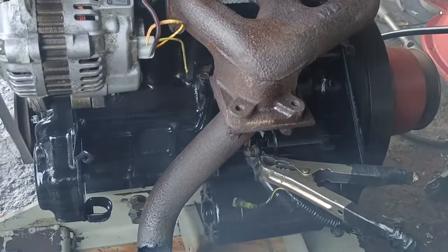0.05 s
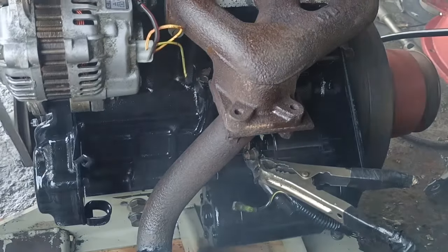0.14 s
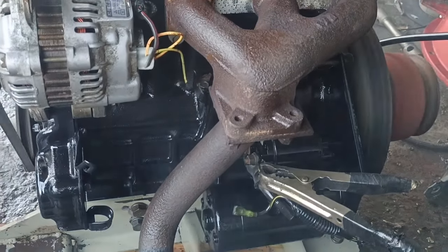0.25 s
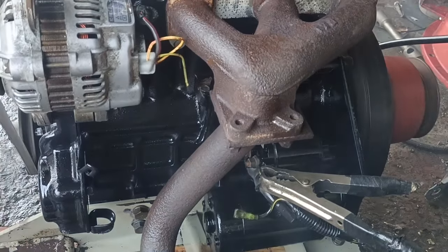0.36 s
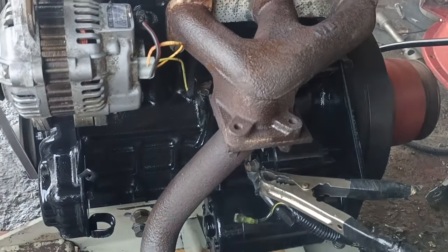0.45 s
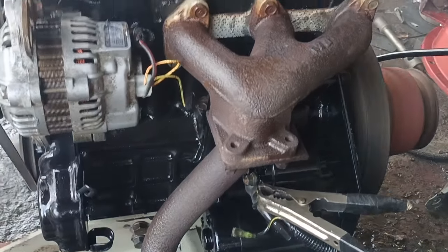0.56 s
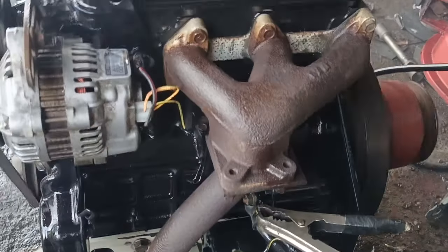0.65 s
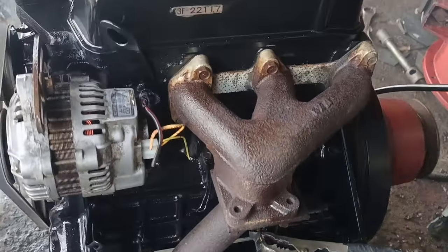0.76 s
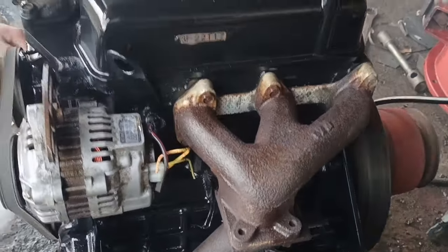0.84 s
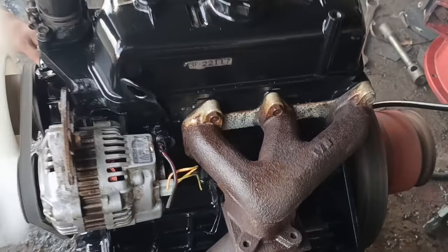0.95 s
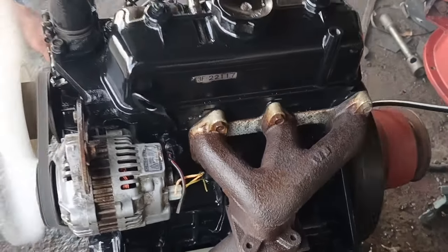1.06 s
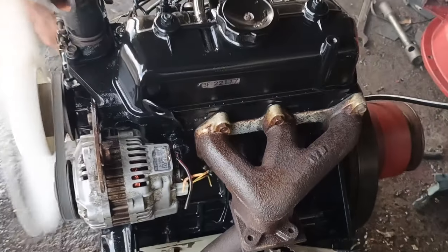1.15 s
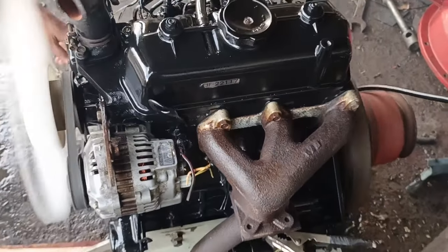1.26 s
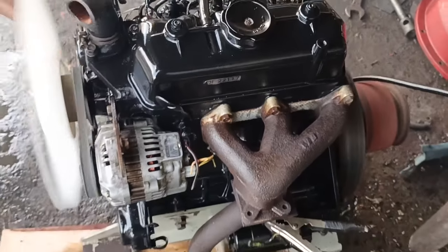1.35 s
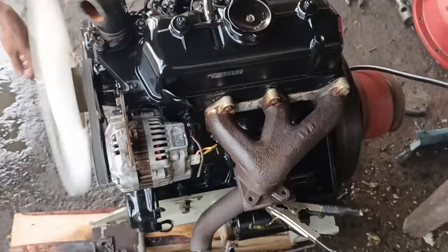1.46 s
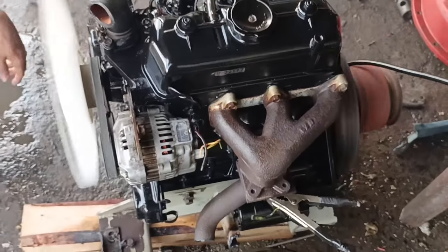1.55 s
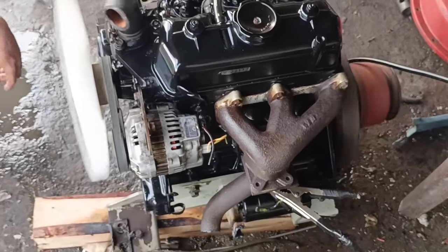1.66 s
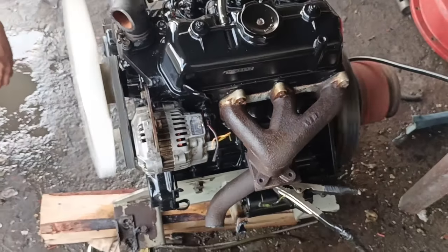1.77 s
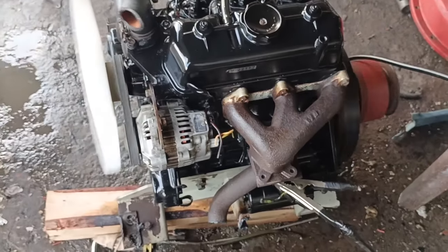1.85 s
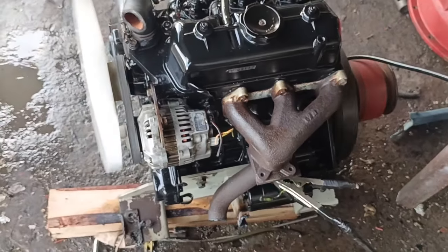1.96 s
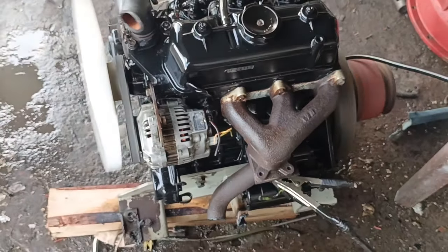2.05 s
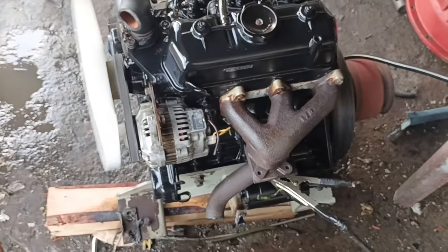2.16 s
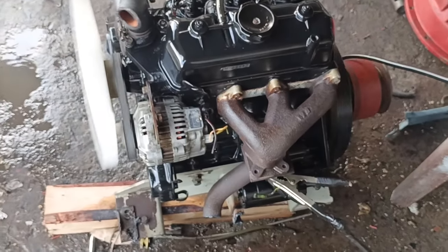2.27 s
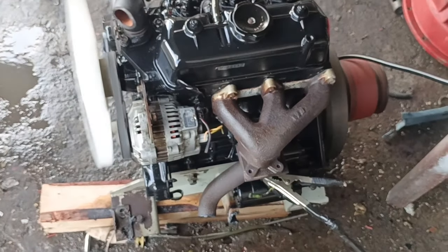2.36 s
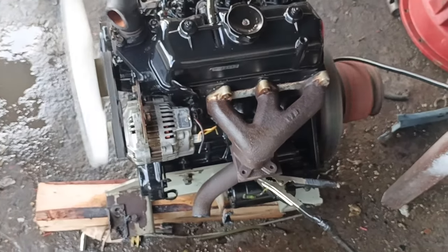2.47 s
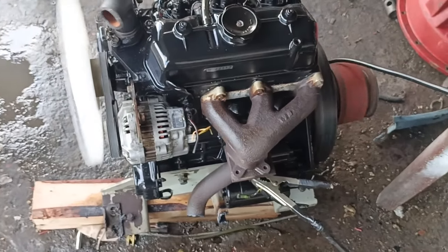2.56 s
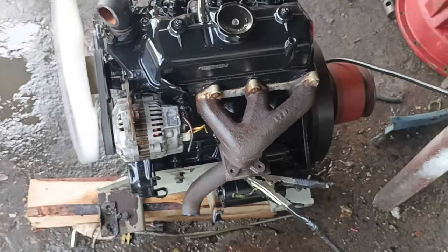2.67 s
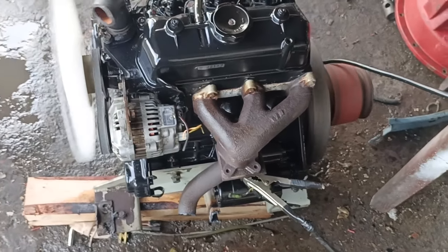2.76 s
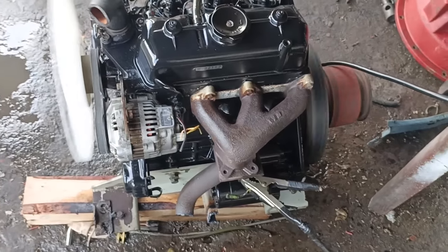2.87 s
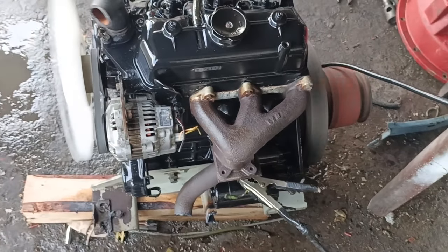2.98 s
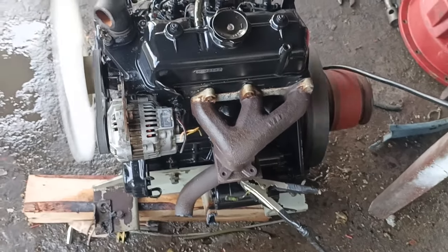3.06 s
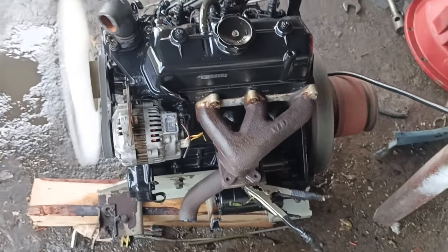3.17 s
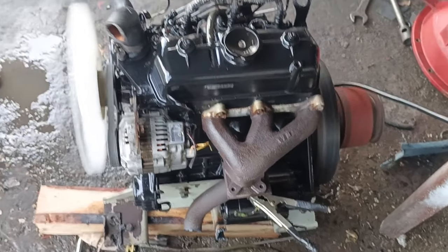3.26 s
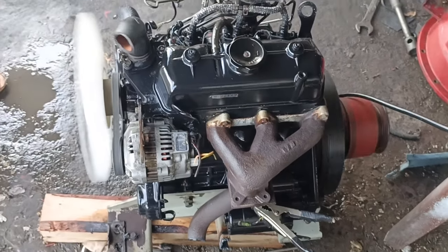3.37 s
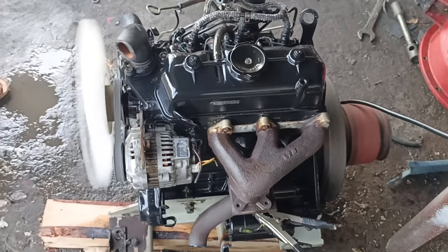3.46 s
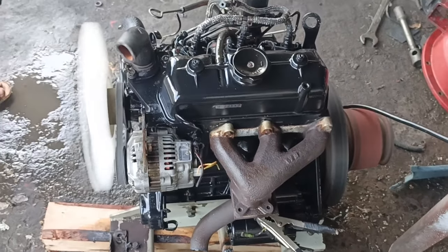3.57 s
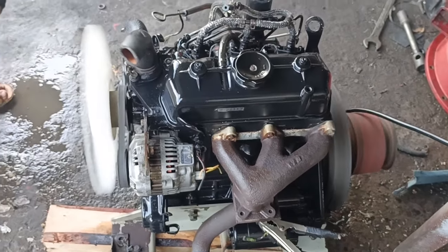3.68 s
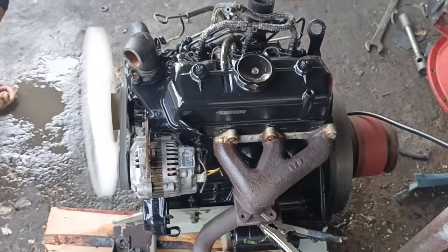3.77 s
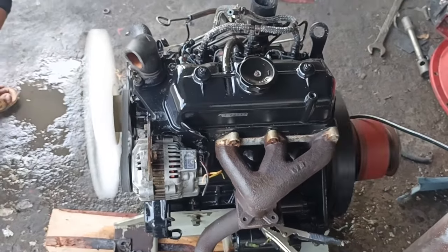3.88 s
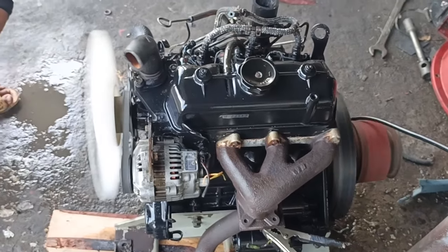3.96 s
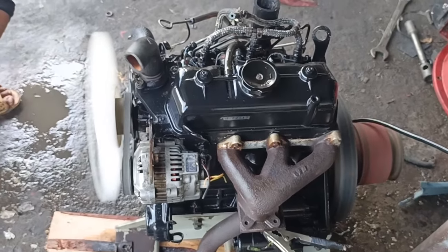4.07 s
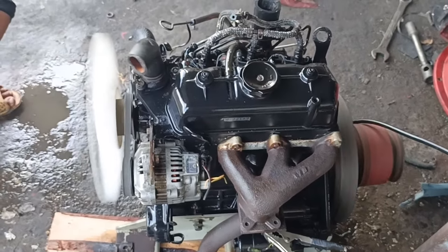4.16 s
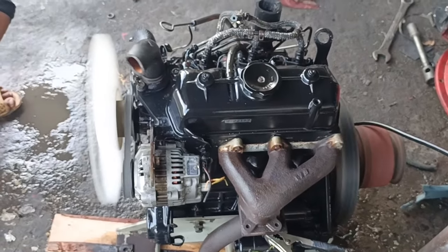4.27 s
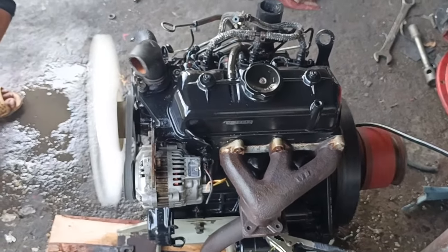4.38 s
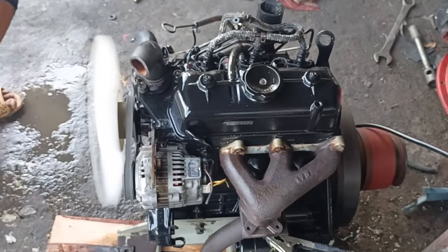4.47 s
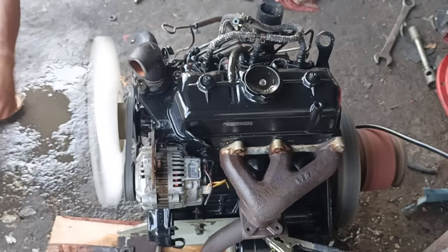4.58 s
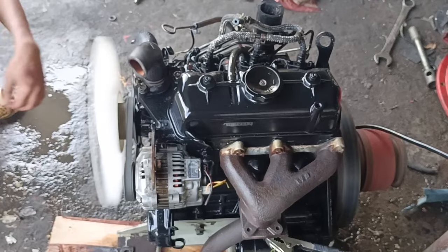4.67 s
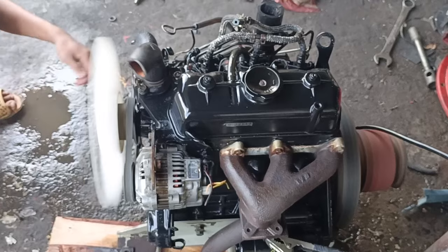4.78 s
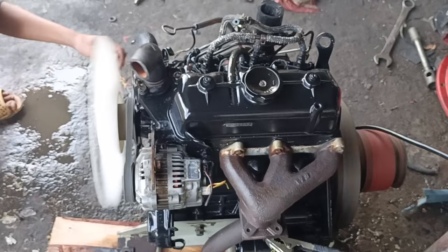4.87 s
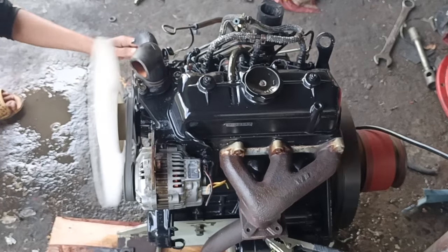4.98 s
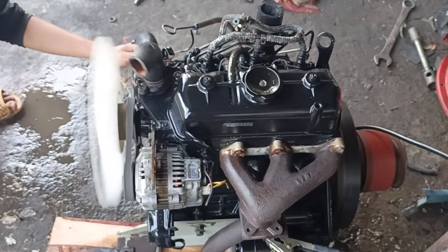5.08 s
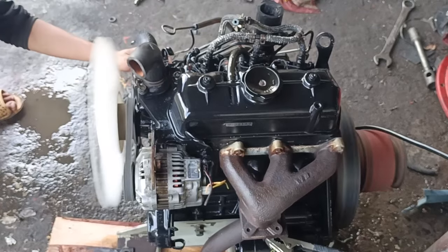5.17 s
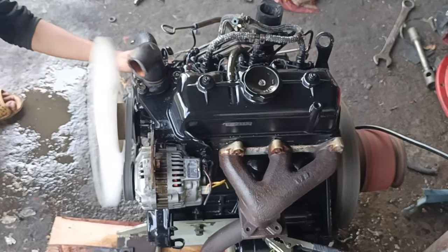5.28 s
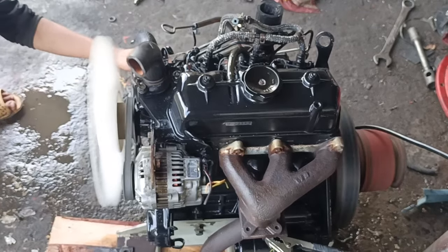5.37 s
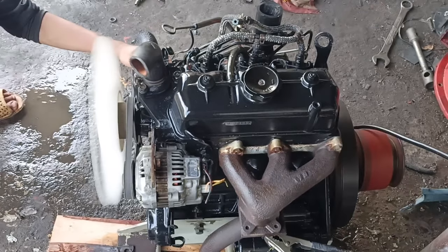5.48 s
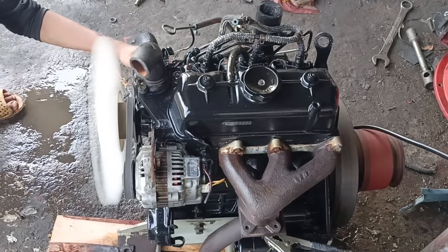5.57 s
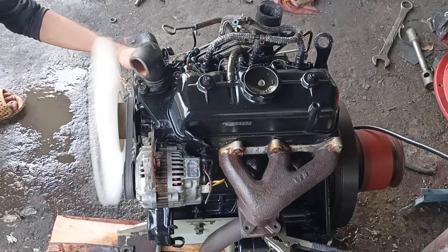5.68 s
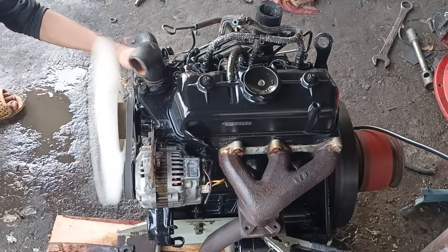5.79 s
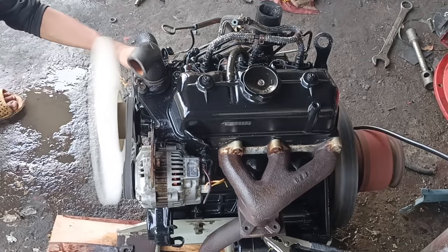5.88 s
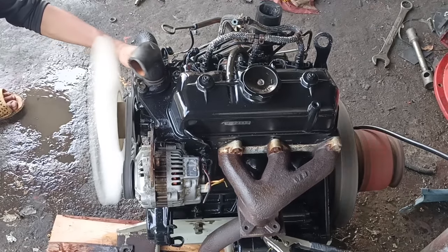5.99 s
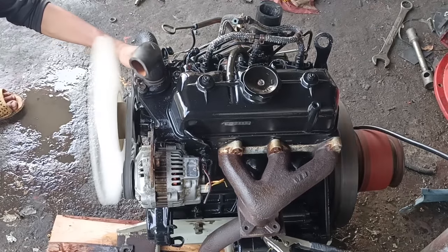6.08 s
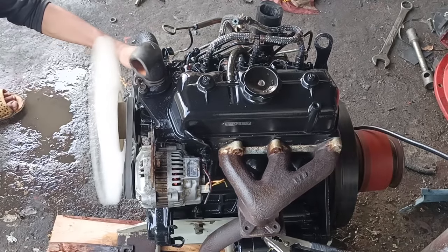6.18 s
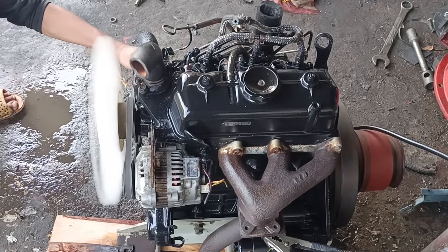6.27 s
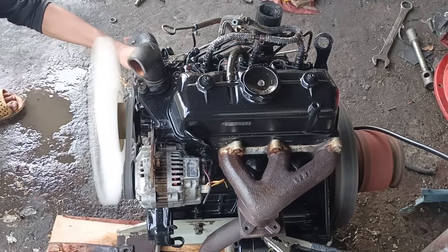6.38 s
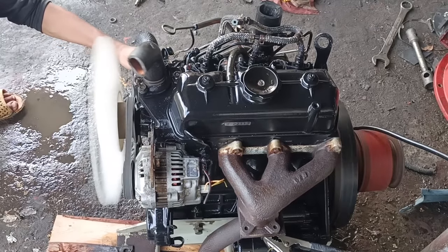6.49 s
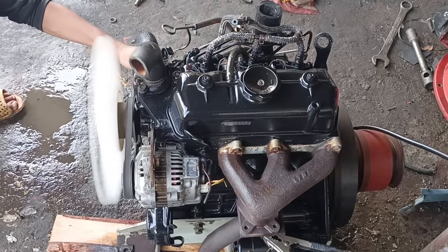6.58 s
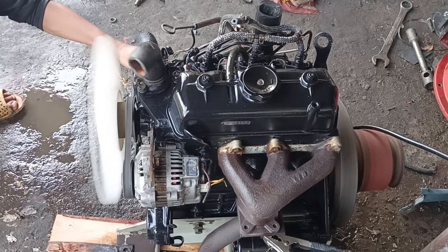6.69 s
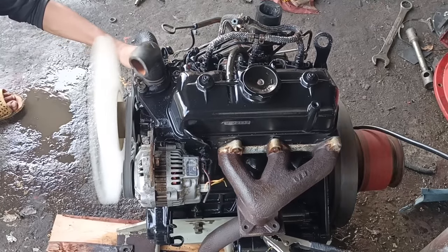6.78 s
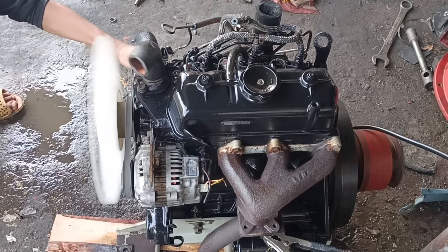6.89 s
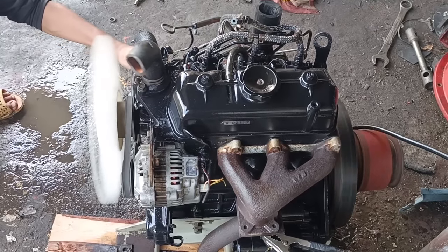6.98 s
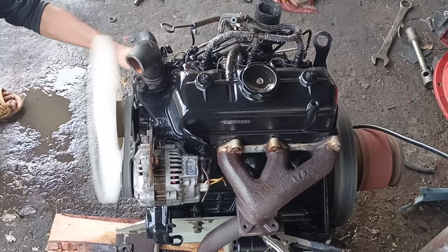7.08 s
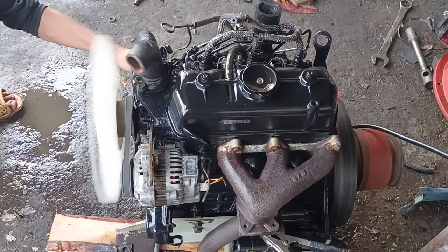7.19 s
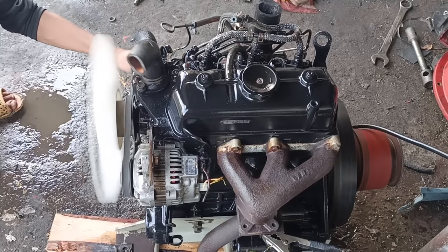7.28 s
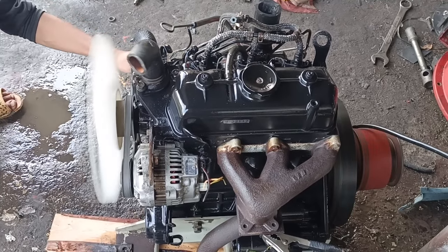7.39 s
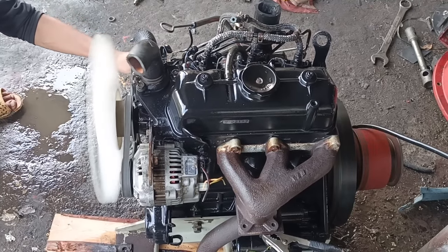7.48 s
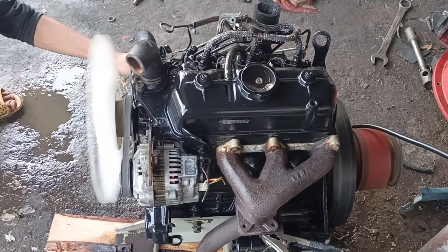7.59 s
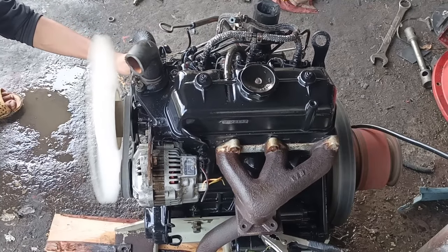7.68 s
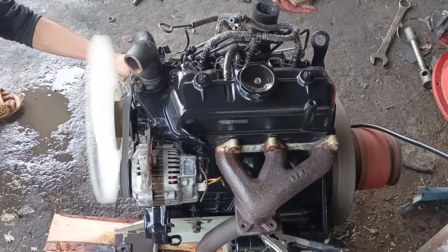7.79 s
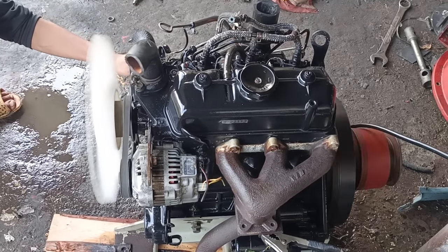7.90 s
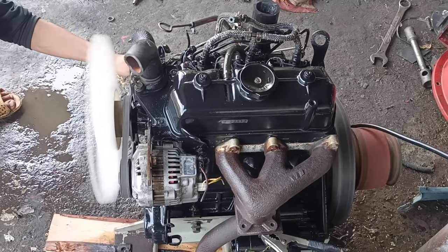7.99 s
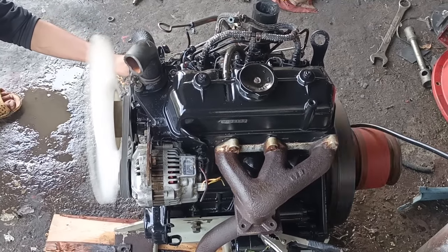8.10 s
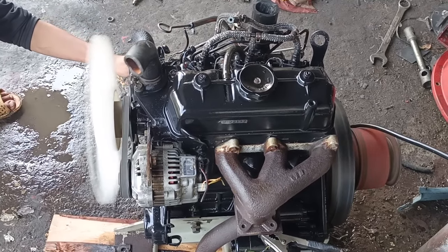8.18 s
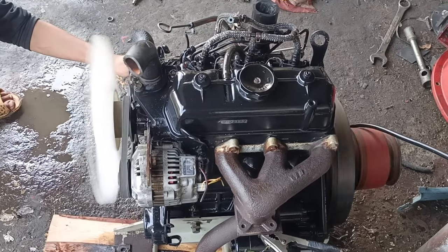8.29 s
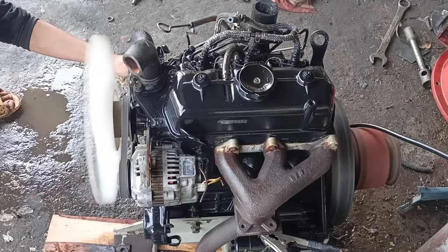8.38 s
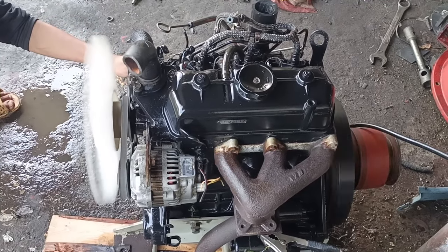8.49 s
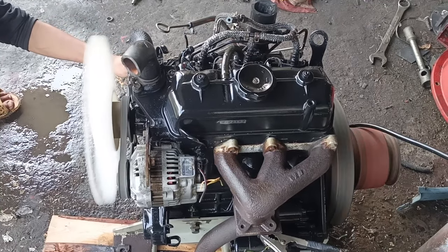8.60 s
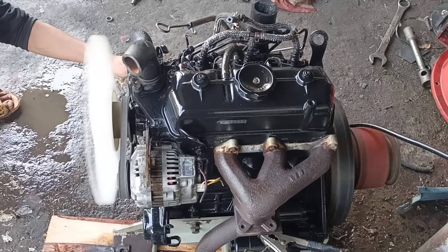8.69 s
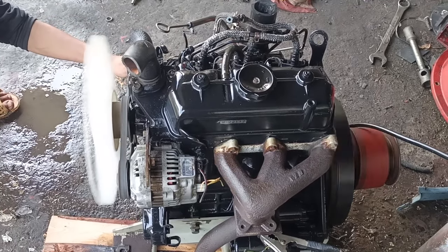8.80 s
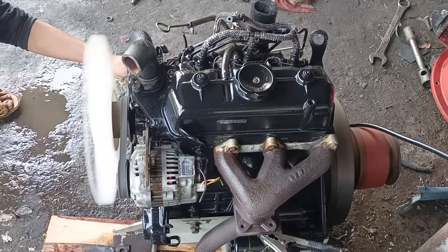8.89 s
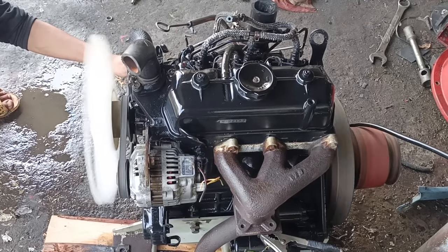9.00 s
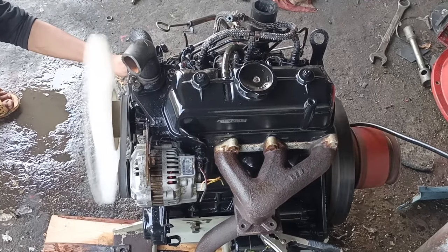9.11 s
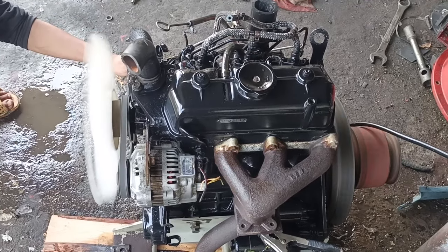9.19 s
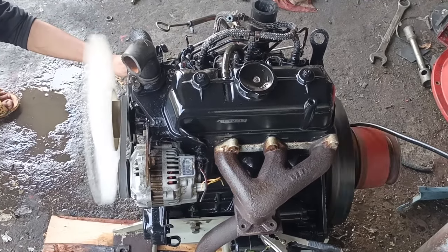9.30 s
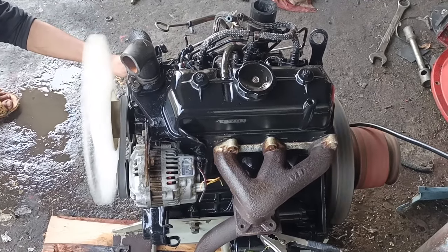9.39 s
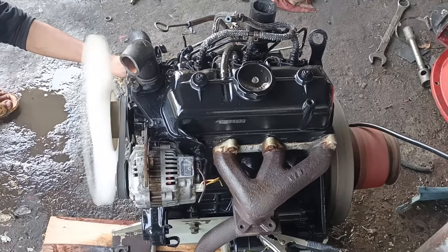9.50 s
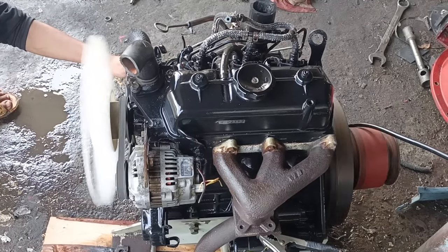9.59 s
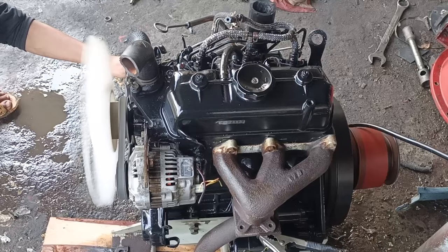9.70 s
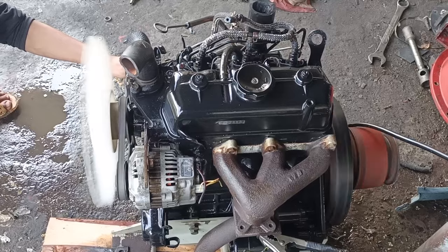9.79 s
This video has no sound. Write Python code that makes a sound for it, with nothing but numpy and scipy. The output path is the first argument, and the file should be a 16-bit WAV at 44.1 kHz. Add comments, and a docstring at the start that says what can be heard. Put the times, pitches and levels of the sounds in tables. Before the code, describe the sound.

A small diesel engine idles with a throbbing, rattling clatter, then loses its fuel and gradually runs down.

```python
"""A bare three-cylinder diesel idles on a workshop floor, then its fuel is shut off and it runs down.
The microphone starts close by the open exhaust pipe and draws back. The engine's sounds follow the
crank: exhaust and intake throb, the valves bark, the block knocks, the gears rattle, the injectors
tick and thin metal pings. A faint rubbing hiss comes at the start and again near the end;
midway a low drone swells once and sinks, as of another motor nearby."""
import sys
import numpy as np
from scipy import signal
from scipy.fft import rfft, irfft, next_fast_len
from scipy.io import wavfile
from scipy.ndimage import uniform_filter1d

SR = 44100
rng = np.random.default_rng(int(sys.argv[2]) if len(sys.argv) > 2 else 0)


def int16_out(signal):
    """Quantize to a 16-bit WAV file."""
    q = np.round(np.clip(np.atleast_2d(signal).T, -1, 1) * 32767)
    wavfile.write(sys.argv[1], SR, q.astype(np.int16))


N = 434385
TIME = np.arange(N) / SR
CYLINDERS, CYCLE_DEG, IDLE_FIRING_HZ = 3, 720, 49.1
LEFT_RIGHT = np.array([[1], [-1]])


def amp(db):
    """Decibels to gain."""
    return 10 ** (np.asarray(db) / 20)


def follow(rows, column=1):
    """One column of a timed table, at every sample."""
    rows = np.asarray(rows, float)
    return np.interp(TIME, rows[:, 0], rows[:, column])


def spectrum_at(points, hz):
    """A spectrum, joined on a log-frequency axis."""
    f, value = np.transpose(points)
    return np.interp(np.log(hz + 1), np.log(f + 1), value)


def swell(middle_s, half_s):
    """A smooth rise, hold and fall of height 1."""
    return np.exp(-((TIME - middle_s) / half_s) ** 4)


def steady(pair):
    """Brings a stereo sound to unit level, keeping its fast beat."""
    power = uniform_filter1d(uniform_filter1d(pair.mean(0) ** 2, size=10800), size=10800)
    return pair / np.sqrt(abs(power) + 1e-20)


# Engine speed, idling and then running down: t/s, firing rate/Hz
FIRING_RATE = [(0, 49.0), (2, 49.0), (2.5, 49.12), (5.5, 49.24), (6.65, 49.16), (6.95, 50.07), (7.4, 46.36),
               (8.0, 39.13), (8.3, 37.84), (8.9, 33.54), (9.4, 29.46), (9.85, 26.1)]

def crank_angle():
    """Degrees the crank has turned; each cylinder fires once a cycle."""
    return CYCLE_DEG * np.cumsum(follow(FIRING_RATE)) / SR / CYLINDERS


# The engine catches again on a little fuel: middle t/s, half length/s, share of idle fuel
FUEL_CATCHES = [(7.327, 0.23, 0.73), (8.22, 0.14, 0.2)]

def starvation(cut_s=6.85, drain_s=0.15):
    """The share of idle fuel missing from the cylinders as the shut-off line drains."""
    supply = np.clip(1 - (TIME - cut_s) / drain_s, 0, 1)
    catches = sum(share * swell(s, half_s) for s, half_s, share in FUEL_CATCHES)
    return 1 - np.clip(supply + catches, 0, 1)


# Microphone drawing back: t/s, nearness to the manifold 0-1, block level/dB over the resting place
MIC_PATH = [(0, 0.88, 3), (.7, 0.86, 2.5), (1.15, 0.28, 2), (1.85, 0.18, -0.5), (2.6, 0.27, -0.16),
            (3.2, 0.08, 0.8), (3.8, 0, -0.2), (9.85, 0, 0)]

def loudness(idle_db, speed_power, starved_db=0, manifold_db=0):
    """The gain of one part: it follows speed, fuel and the microphone's distance."""
    place_db = manifold_db * follow(MIC_PATH) + follow(MIC_PATH, column=2)
    speed = follow(FIRING_RATE) / IDLE_FIRING_HZ
    return amp(idle_db + starved_db * starvation() + place_db) * speed ** speed_power


def close_pan(left_db):
    """Close up, a part sits to one side of the microphone."""
    return amp(left_db * follow(MIC_PATH) * LEFT_RIGHT)


# Likeness of the microphone's two ports: f/Hz, correlation (clipped to 0-1)
PORT_LIKENESS = [(100, 1.5), (300, 0.9), (500, 1.03), (1000, 0.78), (2400, 0.43), (3300, 0), (4500, 0.07),
                 (8000, 0.05), (15000, -0.15)]
# Balance of the ports: f/Hz, left minus right level/dB
PORT_BALANCE = [(200, 1.5), (500, 0.5), (1000, 2.5), (1700, 3.5), (2500, 1.5), (3600, -1), (5000, -3.5),
                (7500, -8), (10000, 12.5), (15000, 4)]
# Resonances of thin metal parts: f/Hz, width/Hz, lift/dB
METAL_RESONANCES = [(1870, 62, 3), (2483, 25, 3.5), (3450, 55, 0.5), (3880, 69, 2), (5225, 69, 6.5),
                    (7400, 65, 1)]

def at_microphone(pair, colour, low_cut_hz=48):
    """Colours two unrelated signals and blends them into what the two ports pick up, at unit level."""
    size = next_fast_len(N + 4096)
    hz = np.fft.rfftfreq(size, 1 / SR)
    shared, apart = rfft(pair, size)
    likeness = np.clip(spectrum_at(PORT_LIKENESS, hz), 0, 1)
    lean = amp(spectrum_at(PORT_BALANCE, hz) / 2)
    right = likeness * shared + np.sqrt(1 - likeness ** 2) * apart
    ports = np.array([shared * lean, right / lean])
    ring_db = sum(db / (1 + (2 * (hz - f) / width) ** 2) for f, width, db in METAL_RESONANCES)
    low_cut = hz ** 3 / (hz ** 3 + low_cut_hz ** 3)
    response = low_cut * amp(spectrum_at(colour, hz) + ring_db)
    return steady(irfft(ports * response, size)[:, :N])


def strikes(crank, degrees, jitter_s, scatter_db):
    """One strike a cycle near a crank angle: the samples it lands on and its level scatter in dB."""
    times = np.interp(np.arange(degrees, crank[-1], CYCLE_DEG), crank, TIME)
    late, force = rng.standard_normal((len(times), 2)).T
    return np.clip(((times + jitter_s * late) * SR).astype(int), 0, N - 1), scatter_db * force


def blows(crank, table, rise_s, rough, scatter_db, jitter_s, room_db, room_s):
    """Each blow rings partly alike every cycle, partly as loose chatter, and dies in the workshop."""
    t = np.arange(SR // 8) / SR
    alike, power = np.zeros((2, N)), np.zeros(N)
    room_tail = amp(room_db) * np.exp(-t / room_s)
    for degrees, db, decay_s in table:
        struck, force_db = strikes(crank, degrees, jitter_s, scatter_db)
        clicks = np.zeros(N)
        clicks[struck] = amp(db + force_db)
        fade = (1 - np.exp(-t / rise_s)) * np.hypot(np.exp(-t / decay_s), room_tail)
        alike += signal.oaconvolve(clicks[None], fade * rng.standard_normal((2, len(t))), axes=1)[:, :N]
        power += signal.oaconvolve(clicks ** 2, fade ** 2)[:N]
    chatter = np.sqrt(rough * abs(power)) * rng.standard_normal((2, N))
    return np.sqrt(1 - rough) * alike + chatter


def pipe_response(points, hz):
    """A pipe's gain and phase: it can only ring after it is struck, so its resonances lag."""
    grid = np.fft.rfftfreq(8192, 1 / SR)
    log_gain = np.log(amp(spectrum_at(points, grid)))
    lag = signal.hilbert(np.r_[log_gain, log_gain[-2:0:-1]]).imag[:len(grid)]
    return np.interp(hz, grid, np.exp(log_gain - 1j * lag))


# Responses of the two open pipes, and the colour of their turbulence: f/Hz, level/dB
EXHAUST_RESPONSE = [(25, -41), (49, -22), (75, -13), (98, 0.5), (147, -1), (190, -20.5), (245, -5),
                    (295, -13), (344, -7.5), (393, -30), (520, -15.5), (700, -47)]
INTAKE_RESPONSE = [(25, -53.5), (60, -18.5), (90, -14), (116, 6.5), (129, 1.5), (141, -2.5), (163, -21),
                   (196, 1), (235, 1), (280, -3.5), (340, -14), (420, -22), (700, -31)]
GUST_SPECTRUM = [(15, -45), (35, -33), (60, -13), (110, 0), (170, -4.5), (280, -0.5), (380, -7.5),
                 (520, -17), (900, -38)]

def pipe_throb(crank, exhaust_deg=32, intake_deg=16, uneven=0.2, strongest_deg=560, gust_db=-36):
    """Each firing sends one pulse of gas through the exhaust and one through the intake."""
    firing_hz = follow(FIRING_RATE)
    phase = np.radians(crank) * CYLINDERS / 2
    exhaust = loudness(idle_db=-27.5, speed_power=1.2, starved_db=-15.5, manifold_db=7.0)
    intake = loudness(idle_db=-30.0, speed_power=1.6, starved_db=-0.3, manifold_db=-6.5)
    pulses = np.zeros(N)
    for strength, response, degrees in ((-exhaust, EXHAUST_RESPONSE, exhaust_deg),
                                        (intake, INTAKE_RESPONSE, intake_deg)):
        pipe_phase = phase - np.radians(degrees) * CYLINDERS / 2
        for k in range(1, 13):
            overtone = pipe_response(response, k * firing_hz) * np.exp(1j * k * pipe_phase)
            # a pulse lasts a fixed crank angle, so it softens as the engine slows
            pulses += strength * overtone.real / (1 + (k / 8) ** 8)
    # one cylinder breathes harder than the others, and no two firings are equal
    lope = 1 + uneven * np.cos(np.radians(crank - strongest_deg) / 2)
    firings = phase / (2 * np.pi)
    draws = rng.standard_normal(int(firings[-1]) + 2)
    waver = 1 + 0.03 * np.interp(firings, np.arange(len(draws)), draws)
    # turbulence leaves the pipes with each puff
    gust = at_microphone(rng.standard_normal((2, N)) * (1 + 0.045 * np.sin(phase)), GUST_SPECTRUM)
    flow = np.hypot(exhaust, intake)
    return np.sqrt(2) * pulses * lope * waver + amp(gust_db) * np.sqrt(flow / flow.mean()) * gust


def off_centre(pair, lean_db=0.09, near_lean_db=0.16, lag_s=0.00004, near_lag_s=0.00006):
    """The pipes lie off the microphone's axis: louder and later on the left, the more so close up."""
    left = np.interp(TIME - lag_s - near_lag_s * follow(MIC_PATH), TIME, pair[0])
    return np.array([left, pair[1]]) * amp(lean_db * LEFT_RIGHT) * close_pan(near_lean_db)


# Exhaust valve cracks in one cycle: crank/deg, level/dB, decay/s
VALVE_BLOWS = [(17.37, -4, 0.003), (49.5, 0, 0.0019), (246, -2.5, 0.00066), (274.2, -1.5, 0.0011),
               (486.4, -5.5, 0.0043), (508.8, -3, 0.001)]
# Their hollow colour: f/Hz, level/dB
VALVE_SPECTRUM = [(220, -6), (380, -3), (480, -6.5), (560, -3), (620, -1.5), (680, -6), (760, -3),
                  (850, -0.5), (925, 2.5), (1020, -5.5), (1170, -7.5), (1290, -4.5), (1450, -11.5),
                  (2400, -34)]
# Overtones that return at every firing: multiple of the firing rate, level/dB
VALVE_HUM = [(9, -19), (11, -22), (12, -22), (13, -14.5), (15, -17.5), (17, -13), (18, -12.5), (20, -23),
             (22, -14.5)]

def valve_bark(crank, crack_db=-0.9, crack_deg=42, spread_rad=0.63):
    """The hollow crack of each exhaust valve opening, and the hum that its repeats make at idle."""
    drive = blows(crank, VALVE_BLOWS, rise_s=0.00053, rough=0.29, scatter_db=0.5, jitter_s=0.00005,
                  room_db=-13.0, room_s=0.046)
    cracks = amp(crack_db) * at_microphone(drive, VALVE_SPECTRUM)
    phase = np.radians(crank - crack_deg) * CYLINDERS / 2
    hum = sum(amp(db) * np.cos(k * phase + spread_rad * rng.standard_normal()) for k, db in VALVE_HUM)
    firing_hz = follow(FIRING_RATE)
    hum *= np.sqrt(2) * (firing_hz / firing_hz.max()) ** 5
    return (cracks + hum) * loudness(idle_db=-29.0, speed_power=1.25, starved_db=-1.1, manifold_db=1.3)


# Blows on the block in one cycle: crank/deg, level/dB, decay/s
BLOCK_BLOWS = [(124.16, 0.5, 0.0074), (151.6, -3.5, 0.0065), (193.9, 3.5, 0.0046), (362, 0.5, 0.0011),
               (390, 5.5, 0.0031), (430, -2, 0.0023), (608.6, -7, 0.009), (666, 3.5, 0.005)]
# The block's hard colour: f/Hz, level/dB
BLOCK_SPECTRUM = [(790, -22), (1350, -5.5), (1530, -8.5), (1690, 0), (1800, -5.5), (1950, 0), (2120, -3),
                  (2390, 1.5), (2560, -1), (2830, -7.5), (3000, -6), (3900, -47), (6600, -120)]

def block_knock(crank, ring_db=-31, ring_hz=1700):
    """Combustion and valve gear knock on the block; close up, the manifold rings on the left."""
    drive = blows(crank, BLOCK_BLOWS, rise_s=0.00037, rough=0.58, scatter_db=1.85, jitter_s=0.0001,
                  room_db=-6, room_s=0.044)
    gain = loudness(idle_db=-27.0, speed_power=1.61, starved_db=-1.0, manifold_db=-4.5)
    block = at_microphone(drive, BLOCK_SPECTRUM) * gain
    ring = steady(signal.lfilter(*signal.iirpeak(ring_hz, Q=12, fs=SR), block))
    manifold = ring * follow(MIC_PATH) * amp(ring_db)
    return (block + manifold) * close_pan(left_db=3)


# Bursts of gear chatter in one cycle: crank/deg, level/dB, decay/s
GEAR_BLOWS = [(175, -0.5, 0.0054), (408.3, 4.5, 0.005), (660, -1, 0.0043)]
# Their bright colour: f/Hz, level/dB
GEAR_SPECTRUM = [(1650, -32), (2800, -4), (2890, -14), (3180, 3), (3310, 0), (3380, -4), (3570, -3.5),
                 (3680, -14), (3800, 0), (3980, -3.5), (4250, -13.5), (4600, -16.5), (5980, -45),
                 (10100, -120)]

def gear_rattle(crank):
    """The timing gears chatter as each power stroke speeds up the crank; close up, to the right."""
    drive = blows(crank, GEAR_BLOWS, rise_s=0.0014, rough=0.83, scatter_db=1.85, jitter_s=0.0005,
                  room_db=-12.5, room_s=0.072)
    gain = loudness(idle_db=-34.1, speed_power=2.17, starved_db=-2.0, manifold_db=-1.3)
    return at_microphone(drive, GEAR_SPECTRUM) * gain * close_pan(left_db=-2)


# Injector snaps in one cycle: crank/deg, level/dB, decay/s
INJECTOR_BLOWS = [(120, 5.5, 0.0026), (187.4, -1.5, 0.017), (361.5, 7.5, 0.0035), (432, -1, 0.0051),
                  (605, 7.5, 0.0048), (663, 2.5, 0.0081)]
# Their sharp colour: f/Hz, level/dB
INJECTOR_SPECTRUM = [(2590, -18), (4400, -1), (4930, -8.5), (5370, -5.5), (5610, -3), (6630, -3.5),
                     (7190, 1), (9030, -7), (10200, -5), (13500, -7), (15200, -1.5), (16000, -9.5)]

def injector_tick(crank):
    """Each injector snaps, and a fizz of small impacts follows; close up, to the left."""
    drive = blows(crank, INJECTOR_BLOWS, rise_s=0.00058, rough=0.8, scatter_db=1.4, jitter_s=0.0001,
                  room_db=-6.5, room_s=0.039)
    gain = loudness(idle_db=-39.0, speed_power=1.46, starved_db=-0.5, manifold_db=0.3)
    return at_microphone(drive, INJECTOR_SPECTRUM) * gain * close_pan(left_db=1.8)


# Covers, pipes and block walls: crank/deg, f/Hz, level/dB, decay/s, change without fuel/dB
METAL_PINGS = [(44.9, 620, 2.5, 0.0068, 3), (270.6, 605, -0.5, 0.0064, 3), (502.6, 630, -4, 0.012, 3),
               (49.4, 920, -2.5, 0.0077, 1), (365, 1960, -3, 0.0075, -1), (405.5, 2477, 0, 0.0092, 1),
               (175, 2477, -4.5, 0.011, 6), (409.7, 3290, -2, 0.011, -3.5), (665, 3290, -11, 0.012, -2),
               (414.3, 3880, -10, 0.01, -7), (185, 5260, -20, 0.013, -6), (435, 5260, -19.5, 0.012, -5),
               (122.3, 7340, -17, 0.009, 9), (610, 7340, -18, 0.0078, 2)]

def metal_pings(crank, scatter_db=1.6, jitter_s=0.0003, rise_s=0.00057, port_phase_rad=0.28):
    """Thin metal rings on after a blow once a cycle, reaching the two ports out of step."""
    t = np.arange(SR // 10) / SR
    out, starved = np.zeros((2, N)), starvation()
    for degrees, hz, db, decay_s, starved_db in METAL_PINGS:
        struck, force_db = strikes(crank, degrees, jitter_s, scatter_db)
        clicks = np.zeros(N)
        clicks[struck] = amp(db + force_db + starved_db * starved[struck])
        fade = (1 - np.exp(-t / rise_s)) * np.exp(-t / decay_s)
        ring = fade * np.sin(2 * np.pi * hz * t + port_phase_rad * LEFT_RIGHT)
        lean = amp(spectrum_at(PORT_BALANCE, hz) / 2 * LEFT_RIGHT)
        out += signal.oaconvolve(clicks[None], ring, axes=1)[:, :N] * lean
    return out * loudness(idle_db=-26.0, speed_power=2.2, manifold_db=-6.5)


# Spells of faint rubbing: middle t/s, half length/s, level/dB
RUB_SPELLS = [(0.3, 0.77, -39), (9.055, 0.52, -47.5)]
# Their thin colour: f/Hz, level/dB
RUB_SPECTRUM = [(3500, -35), (4800, -3), (5500, -1.5), (6400, -6.5), (8000, -18), (11000, -11),
                (16000, -16)]

def belt_rub():
    """A thin hiss, as of the belt rubbing."""
    spells = sum(amp(db) * swell(s, half_s) for s, half_s, db in RUB_SPELLS)
    return at_microphone(rng.standard_normal((2, N)), RUB_SPECTRUM) * spells


# Tones of the drone, dead centre: multiple of its pitch, level/dB
DRONE_HARMONICS = [(1, -4), (3, -1), (4, 3.5)]

def nearby_drone(start_s=4.05, rise_s=0.14, hold_s=0.18, fade_s=0.37, hz=74, sag_hz_per_s=17, gain_db=-34):
    """A low hum swells once and sinks in pitch, as of another motor nearby."""
    age = np.maximum(TIME - start_s, 0)
    pitch_hz = np.maximum(hz - sag_hz_per_s * age, hz / 2)
    phase = 2 * np.pi * np.cumsum(pitch_hz) / SR
    shape = np.minimum(age / rise_s, 1) * np.exp(-np.maximum(age - rise_s - hold_s, 0) / fade_s)
    return amp(gain_db) * shape * sum(amp(db) * np.sin(k * phase) for k, db in DRONE_HARMONICS)


def scene():
    """The workshop at the microphone: the crank-driven parts, the hiss and the drone."""
    crank = crank_angle()
    metal = block_knock(crank) + gear_rattle(crank) + injector_tick(crank) + metal_pings(crank)
    return off_centre(pipe_throb(crank)) + valve_bark(crank) + metal + belt_rub() + nearby_drone()


def record(dry):
    """The recorder's band limit."""
    low_pass = signal.firwin(511, cutoff=15950, window=("kaiser", 9), fs=SR)
    return signal.oaconvolve(dry, low_pass[None], "same")


dry = scene()
out = record(dry)
int16_out(out)
```